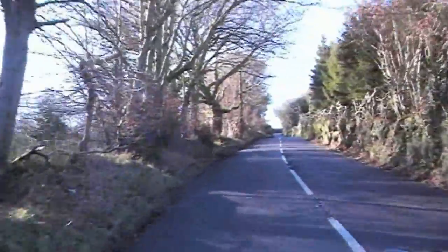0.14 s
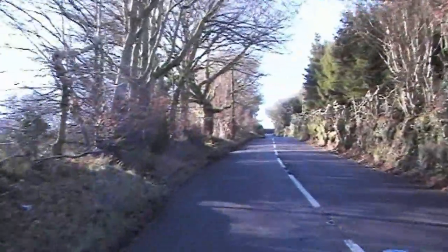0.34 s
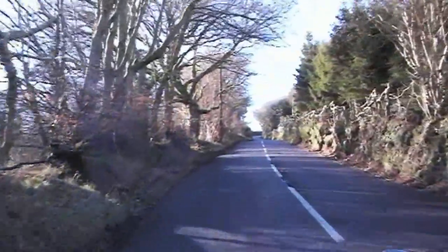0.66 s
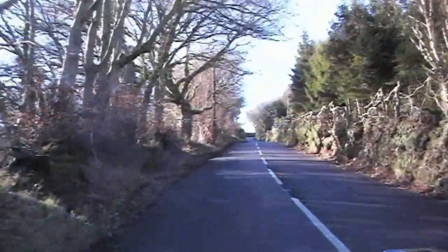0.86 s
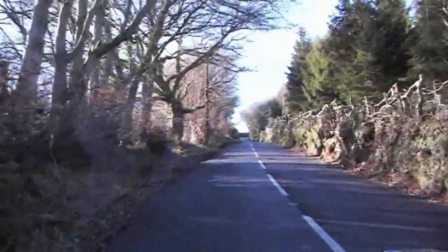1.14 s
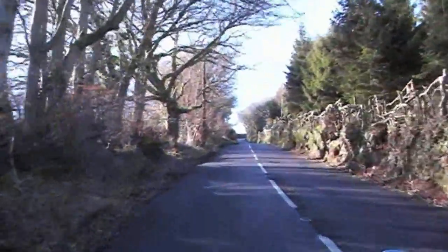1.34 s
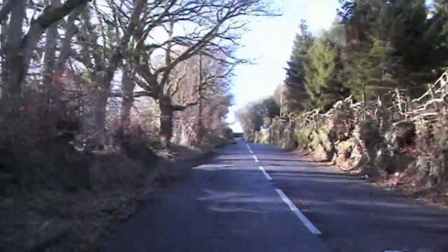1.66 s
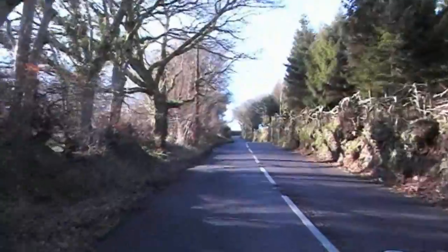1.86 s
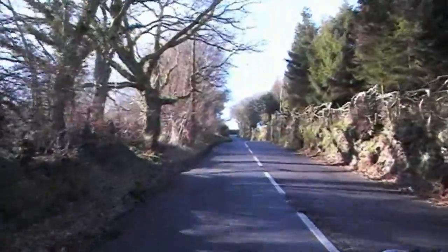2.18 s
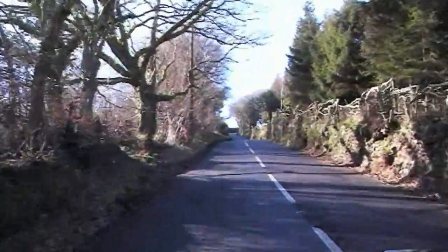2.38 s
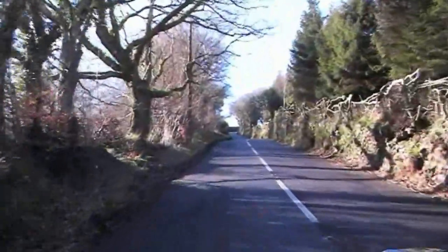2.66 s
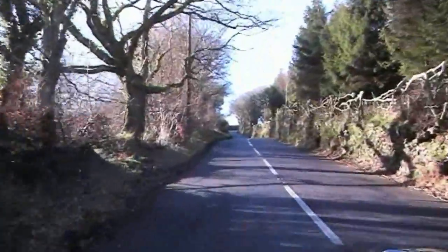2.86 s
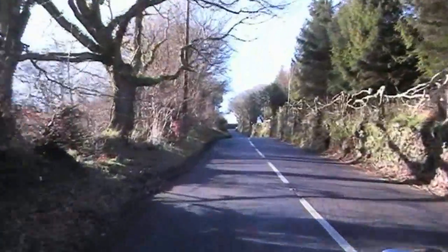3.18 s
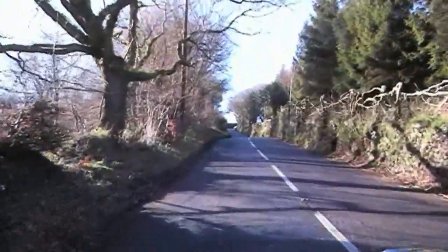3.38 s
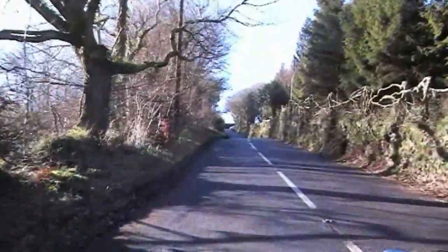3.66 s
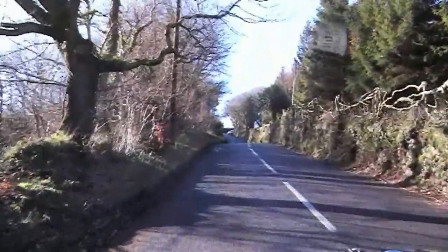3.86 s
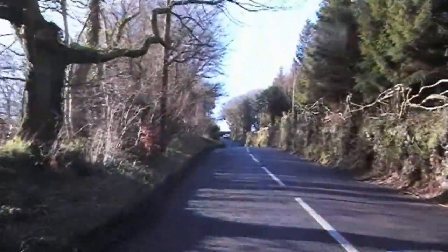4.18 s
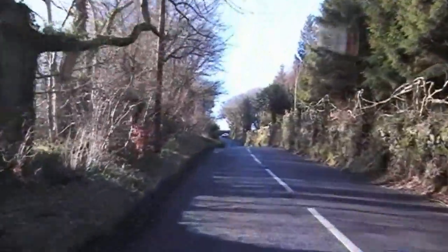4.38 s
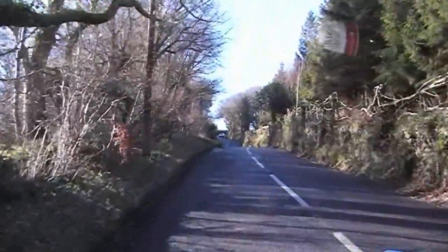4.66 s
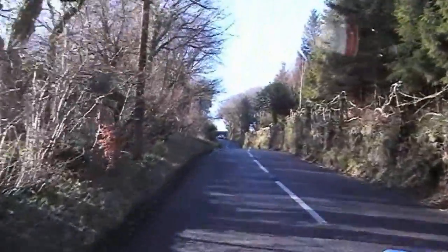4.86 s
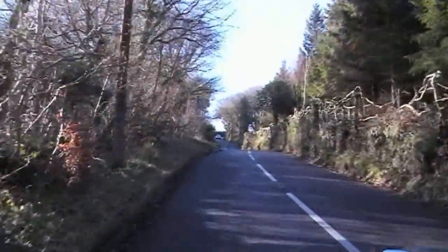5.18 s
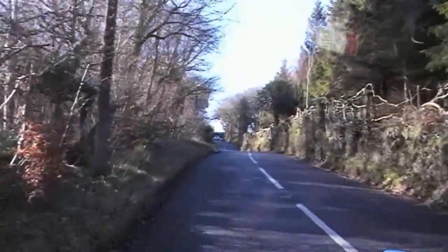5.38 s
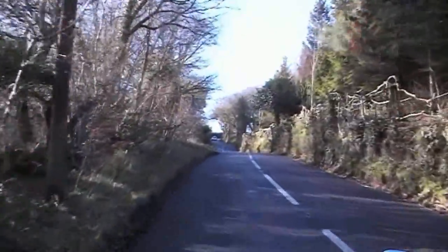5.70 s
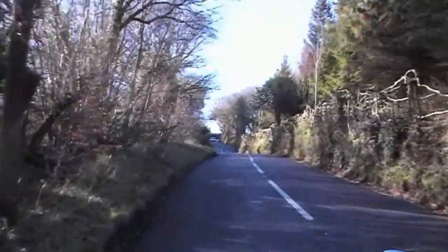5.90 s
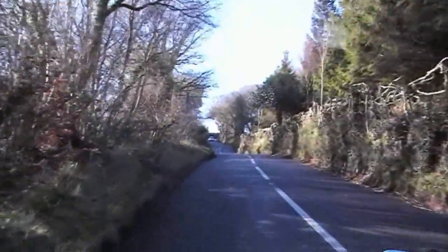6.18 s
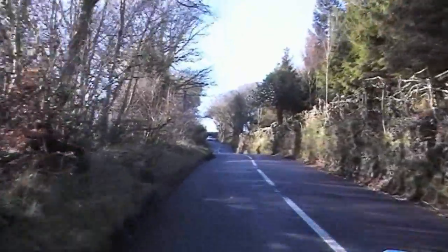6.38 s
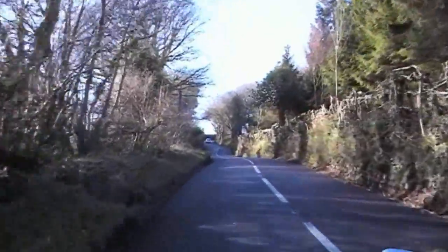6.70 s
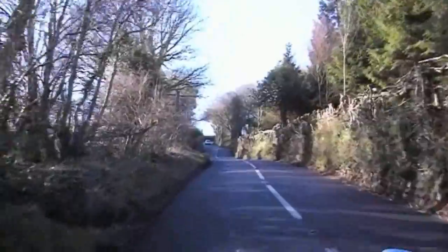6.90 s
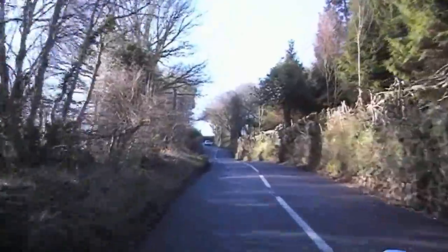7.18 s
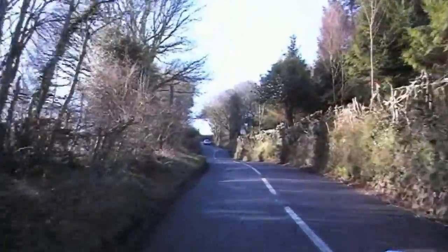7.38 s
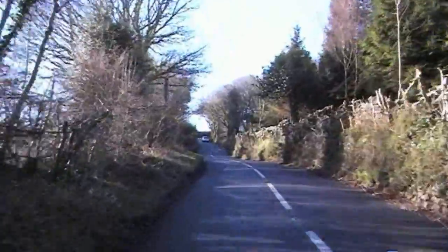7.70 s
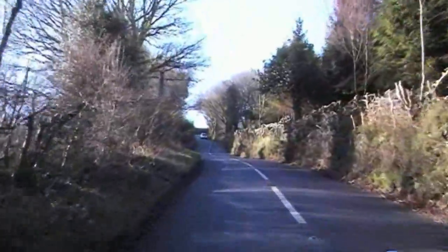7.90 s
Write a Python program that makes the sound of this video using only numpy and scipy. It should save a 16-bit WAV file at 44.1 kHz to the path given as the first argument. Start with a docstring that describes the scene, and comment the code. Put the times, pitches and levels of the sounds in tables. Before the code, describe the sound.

A steady cabin interior of an off-road diesel: low growling hum, fast combustion rattle, broad tyre roar and a bright hiss of rushing air. A thin turbo whistle swells and fades as its pitch sinks a little. After one faint, dull bump, the load comes on just past five seconds, the whistle climbs in swells, and the engine strengthens with a deepening boom until the end.

```python
"""A five-cylinder turbodiesel off-roader heard from inside as it cruises a country lane, then pulls harder from about 5 s.
The engine is sines: an exhaust tone and its booming octave, and a drone on multiples of the four-stroke cycle.
Filtered bursts of noise make the combustion knock. The turbo is two sines that swell on resonances as the
shaft rate glides. Shaped noise makes the tyre roar, one soft suspension thud and the hiss of rushing air."""
import sys
import numpy as np
from scipy import signal
from scipy.fft import rfft, irfft, next_fast_len
from scipy.io import wavfile

SR = 44100
rng = np.random.default_rng(int(sys.argv[2]) if len(sys.argv) > 2 else 0)


def int16_out(signal):
    """Quantize to a 16-bit WAV file."""
    q = np.round(np.clip(np.atleast_2d(signal).T, -1, 1) * 32767)
    wavfile.write(sys.argv[1], SR, q.astype(np.int16))


N = 355005

# Engine speed. Each row: time in seconds, firing rate in Hz.
ENGINE_SPEED = [(0.0, 87.1), (1.0, 86.78), (2.0, 85.37), (3.5, 85.29), (4.0, 85.53), (4.8, 85.26),
                (5.4, 85.76), (6.0, 88.6), (6.75, 91.94), (7.4, 94.9), (8.05, 98.7)]
# Accelerator. Each row: time in seconds, load (near 0 cruising, 1 pulling hard, a little above 1 at the end).
ACCELERATOR = [(0, 0.44), (.9, 0.5), (1.8, 0.12), (3, 0.073), (5.1, 0.073), (5.7, 0.65), (6.3, 1),
               (7.3, 1.033), (8.05, 1.2)]
# Engine drone before the cabin's lift. Each row: multiple of the cycle rate, level at no load in dB,
# rise at load 1 in dB.
DRONE_LINES = [(7, -49, 2), (8, -52, 9), (9, -54, 17), (12, -43.5, -5.5), (14, -53, 5), (15, -48.5, 7.5),
               (16, -52.5, 8), (17, -41, 4), (19, -52.5, 11), (20, -48, 8.5), (21, -46, 6.5),
               (22, -41, -1.5), (23, -43.5, -5), (24, -55.5, 13), (25, -46.5, 2.5), (28, -46.5, 4.5),
               (29, -57, 18), (31, -42.5, 1.5), (35, -39.5, -3), (42, -52, 0), (44, -52.5, 7),
               (50, -48.5, 6), (55, -47.5, -1), (84, -41.5, 3), (88, -39.5, -3), (90, -44, 2)]
# Strength of the knock at no load, in firing order. Each entry: level in dB.
CYLINDER_DB = [0, -3, 0.5, -2.5, 0]
# Spectral outline of the knock through the bulkhead. Each row: frequency in Hz, relative density in dB per Hz.
KNOCK_OUTLINE = [(60, -14), (130, -7), (380, 0), (560, -4), (900, -1.5), (1100, -4.5), (1400, -2.5),
                 (1800, -3), (2000, -14.5), (2800, -13), (3400, -21), (5500, -12), (9000, -29),
                 (13000, -63)]
# Ringing covers and panels. Each row: frequency in Hz, width in Hz, lift in dB (a cut if negative).
PANEL_MODES = [(1420, 71, -18), (1508, 49, 12), (1630, 34, 5), (1700, 53, -4), (1808, 15, 13.5),
               (2173, 44, 12.5)]
# Outline of the tyre and body roar. Each row: frequency in Hz, relative density in dB per Hz.
ROAD_OUTLINE = [(20, -24), (35, -23.5), (60, -7.5), (90, -10), (130, 3), (200, 0), (380, -4.5), (520, -5),
                (850, -5.5), (1150, -6), (1700, 0), (2100, -9), (3500, -17), (8000, -36.5)]
# Outline of the air rushing past the door seals and through the intake.
# Each row: frequency in Hz, relative density in dB per Hz.
AIR_OUTLINE = [(1200, -14), (2400, -5.5), (2850, -1), (3400, -6.5), (4400, -4.5), (5200, -3.5), (6800, -1),
               (8200, -4.5), (9400, -8.5), (11200, -20), (12400, -22.5), (13300, -26), (14200, -30)]
# Narrow resonances of those gaps. Each row: frequency in Hz, width in Hz, lift in dB.
GAP_MODES = [(3930, 69, 5.5), (4825, 180, 7), (5120, 40, 3), (5380, 50, 3), (5350, 100, 9), (6070, 120, 4),
             (6740, 160, 3.5), (7990, 90, 4.5), (8900, 100, 3), (9470, 70, 2)]
# Stereo width, before each layer's own trim. Each row: frequency in Hz, gain into the side signal in dB.
STEREO_WIDTH = [(30, -32), (65, -28), (130, -35), (220, -19), (700, -17), (1600, -23.5), (2800, -14),
                (4200, -13), (5600, -13), (7300, -0.5), (9000, -5), (11000, -5), (14000, -15)]
# Cabin resonances that the drone sweeps through. Each row: frequency in Hz, width in Hz, lift in dB.
CABIN_MODES = [(248, 15.7, 16.5), (373.7, 30, 6.5), (443.5, 24, 12), (491, 4.8, 11.5), (636, 12, 14.5),
               (767, 20, 14.5), (873.6, 21, 8.5), (943, 28, 12), (1529, 26, 14)]
# The wheels cross a dip in the tarmac. Each row: time of the peak in seconds,
# time from peak to 1/e in seconds, peak level in dB.
ROAD_DIPS = [(4.079, .09, -38)]
# Outline of the suspension thud through the floor. Each row: frequency in Hz, relative density in dB per Hz.
THUD_OUTLINE = [(20, -20), (40, -2), (60, 0), (110, -2), (200, -20), (600, -60)]
# Turbo speed. Each row: time in seconds, shaft rate in Hz.
TURBO_SHAFT = [(0.0, 1789), (0.7, 1788), (1.6, 1740), (2.6, 1732), (3.3, 1737), (4.4, 1712), (4.8, 1726),
               (5.25, 1750.0), (5.42, 1778), (5.9, 1895), (6.3, 1982.0), (6.8, 2001.0), (7.4, 2101),
               (8.05, 2208)]
# Air modes of the cabin that boom at twice the firing rate.
# Each row: frequency in Hz, width in Hz, level when met in dB.
BOOM_MODES = [(172.6, 3.5, -32.5), (178.5, 2, -38), (185.5, 2.3, -31.5), (189.1, 3.8, -28.5),
              (194.5, 4.4, -21.5)]
# Resonances between turbo and seat that the whistle glides through.
# Each row: frequency in Hz, width in Hz, level when met in dB.
WHISTLE_MODES = [(1726.7, 14, -28.5), (1757, 12, -30), (1798.3, 9.9, -14), (1815.5, 14, -21),
                 (1870, 24, -25), (1967, 27, -27.9), (2043.6, 27, -28.1), (2132.0, 45.3, -31.5),
                 (2186.9, 30.4, -28.5)]
# Resonances of the intake that pass the blade tone. Each row: frequency in Hz, width in Hz, level when met in dB.
BLADE_MODES = [(10720, 150, -59), (11300, 400, -53), (13030, 600, -55)]

# whine of a belt-driven pulley: multiple of the cycle rate, dB at no load, dB gained at load 1
PULLEY = (50.7, -41.5, 2.5)
TIME = np.arange(N) / SR
PADDED = next_fast_len(N)
BINS = np.maximum(np.arange(PADDED // 2 + 1) * SR / PADDED, 1)  # Hz, kept off zero for the logarithm


def undb(db):
    """Decibels to gain."""
    return np.exp(np.asarray(db) * (np.log(10) / 20))


def unit(x):
    """Scale to rms 1."""
    return x / np.sqrt(np.mean(x ** 2))


def curve(table):
    """Value of a timed table at every sample, gliding between its rows."""
    seconds, values = np.transpose(table)
    return np.interp(TIME, seconds, values)


def noise():
    """White noise."""
    return rng.standard_normal(N)


def walk(rate):
    """Random wander of spread near 1 that glides to a new value rate times a second."""
    levels = rng.standard_normal(2048)
    return np.interp(TIME * rate, np.arange(len(levels)), levels)


def tone(turns):
    """A sine of rms 1, its phase given in turns."""
    return np.sqrt(2) * np.sin(2 * np.pi * turns)


def lift(hz, modes):
    """Gain that resonances add at these frequencies, summed as power."""
    power = 1
    for center, width, db in modes:
        power = power + (undb(db) ** 2 - 1) / (1 + (2 * (hz - center) / width) ** 2)
    return np.sqrt(np.abs(power))


def ringing(hz, modes):
    """Complex gain of a set of resonances: a tone swells on each and can cancel between neighbours."""
    return sum(undb(db) / (1 + 2j * (hz - center) / width) for center, width, db in modes)


def response(points, modes=()):
    """Gain per frequency: a smooth outline lifted by resonances."""
    hz, db = np.transpose(points)
    outline_db = np.interp(np.log(BINS), np.log(hz), db)
    return undb(outline_db) * lift(BINS, modes)


def colour(x, gain):
    """Filter by a gain per frequency."""
    return irfft(rfft(x, PADDED) * gain, PADDED)[:N]


def reflect(x, share=0.36, count=40):
    """Glass and trim add a cluster of reflections within 12 ms, which combs the sound."""
    taps = np.zeros(int(.012 * SR))
    places = rng.integers(len(taps) // 10, len(taps), count)
    taps[places] = share * rng.standard_normal(count) / np.sqrt(count)
    taps[0] = 1  # direct sound
    return signal.oaconvolve(x, taps)[:N]


def air(firings, throb=0.017, gust_db=0.43):
    """Rushing air hisses through resonant gaps, nearly steady, with a trace of the intake's pulsing."""
    hiss = unit(colour(reflect(noise()), response(AIR_OUTLINE, GAP_MODES)))
    gusts = undb(gust_db * walk(5))
    return hiss * gusts * (1 + throb * tone(firings))


def road():
    """Tyres roar through the body: steady noise shaped by one broad outline."""
    return unit(colour(noise(), response(ROAD_OUTLINE)))


def suspension_thud():
    """The suspension thuds softly: low noise that swells and fades as the wheels cross the dip."""
    swell = sum(undb(db) * np.exp(-((TIME - peak) / length) ** 2) for peak, length, db in ROAD_DIPS)
    return swell * unit(colour(noise(), response(THUD_OUTLINE)))


def turbo(cycles, flutter_db=1.3, throb=0.07, slip=0.012, blade_slip=.25, blade_flutter_db=5.0):
    """The shaft whistles and its six blades sing far above; both ring each resonance they glide across."""
    shaft = np.cumsum(curve(TURBO_SHAFT)) / SR  # turns
    blades = 6 * shaft
    # slips are in turns of each tone
    whistle = colour(tone(shaft + slip * walk(35)), ringing(BINS, WHISTLE_MODES))
    whine = colour(tone(blades + blade_slip * walk(70)), ringing(BINS, BLADE_MODES))
    # the exhaust nudges the whistle once per engine cycle
    pulse = 1 + throb * np.sin(2 * np.pi * cycles)
    return whistle * pulse * undb(flutter_db * walk(30)) + whine * undb(blade_flutter_db * walk(6))


def knock(cycles, load, fresh=0.71, fresh_load=0.22, decay=0.54, sustain=0.83, scatter_db=0.5):
    """Each firing is a burst of rattle, partly the same on every cycle, that rings the covers."""
    size = 4096  # points in one cycle of the repeating rattle
    multiples = np.arange(size // 8)
    # the repeating part lies mostly above the drone
    weights = np.clip((multiples - 10) / 30, 0, 1)
    phases = np.exp(2j * np.pi * rng.random(len(multiples)))
    pattern = unit(irfft(weights * phases, size))
    repeated = np.interp(cycles % 1 * size, np.arange(size), pattern)
    firings = cycles * len(CYLINDER_DB)
    k = firings.astype(int)
    # the cylinders even out towards load 1
    cylinder_db = np.array(CYLINDER_DB)[k % len(CYLINDER_DB)] * (1 - load)
    strength = undb(cylinder_db + scatter_db * rng.standard_normal(1024)[k % 1024])
    # decay is in firing intervals
    burst = strength * (sustain + np.exp(-(firings % 1) / decay))
    rattle = repeated + (fresh + fresh_load * load) * noise()
    return unit(colour(burst * rattle, response(KNOCK_OUTLINE, PANEL_MODES)))


def drone(cycles, cycle_hz, load, flutter_db=1.45, slip=.0016, rough=0.17):
    """Unequal cylinders sound multiples of the cycle, a pulley whines between, and cabin modes swell them."""
    speeds = np.linspace(cycle_hz.min(), cycle_hz.max(), 200)
    out = 0
    for multiple, db, load_db in [*DRONE_LINES, PULLEY]:
        gain = undb(db + load_db * load + flutter_db * walk(8))
        cabin = np.interp(cycle_hz, speeds, lift(multiple * speeds, CABIN_MODES))
        # small slips of timing, in cycles, blur the high multiples most
        turns = multiple * (cycles + slip * walk(14)) + rng.random()
        out = out + gain * cabin * tone(turns)
    # no two firings are quite alike
    return out * (1 + rough * walk(85))


def exhaust(firings, firing_hz, load, flutter_db=0.3):
    """The firing tone follows the accelerator; its octave booms where it meets the cabin's air modes."""
    firing_gain = undb(-50 + 20 * load)
    octave_gain = np.abs(ringing(2 * firing_hz, BOOM_MODES))
    out = 0
    for multiple, gain in ((1, firing_gain), (2, octave_gain)):
        out = out + gain * undb(flutter_db * walk(21)) * tone(multiple * firings + rng.random())
    return out


def scene():
    """Air, tyres, turbo and engine heard from the front seat, in stereo as mid plus and minus side."""
    firing_hz, load = curve(ENGINE_SPEED), curve(ACCELERATOR)
    firings = np.cumsum(firing_hz * (1 + 0.0012 * walk(12))) / SR
    cycles, cycle_hz = firings / len(CYLINDER_DB), firing_hz / len(CYLINDER_DB)
    hiss_gain = undb(-27 + 0.67 * load)
    hiss = hiss_gain * air(firings)
    roar = undb(-24.5 + 2.45 * load) * road() + suspension_thud()
    rattle = undb(-23.0 + 1.97 * load) * knock(cycles, load)
    hum = drone(cycles, cycle_hz, load)
    tones = exhaust(firings, firing_hz, load) + turbo(cycles)
    mid = tones + hum + rattle + roar + hiss
    # reflections off the glass reach the two ears differently, mostly in the treble
    side_engine = undb(-24.0 + 5.5 * load) * knock(cycles, load) + undb(-1.5) * (reflect(hum) - hum)
    scattered = side_engine + undb(-23.5) * road() + undb(-0.8) * hiss_gain * air(firings)
    # a quarter-turn phase lead in the side lets direct sound reach the left a little early
    direct = undb(-2.0) * tones + .35 * hiss
    width = response(STEREO_WIDTH)
    side = colour(scattered, width) + colour(direct, 1j * width)
    return np.array([undb(0.09) * (mid + side), mid - side])


def record(dry):
    """A steep elliptic low-pass cuts the treble above 14 kHz."""
    # order 10, 0.2 dB ripple, 80 dB rejection
    low_pass = signal.ellip(10, .2, 80, 14000, fs=SR, output="sos")
    return signal.sosfilt(low_pass, dry)


dry = scene()
out = record(dry)
int16_out(out)
```